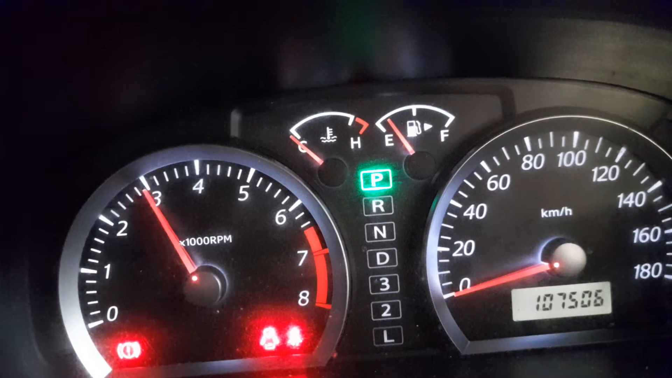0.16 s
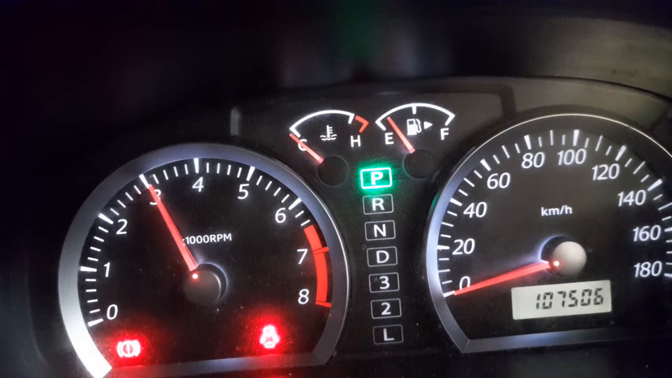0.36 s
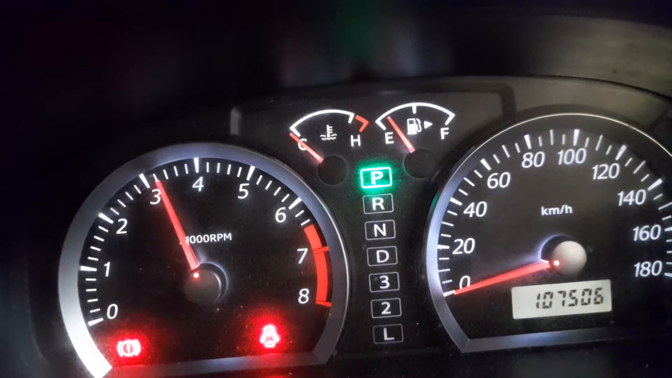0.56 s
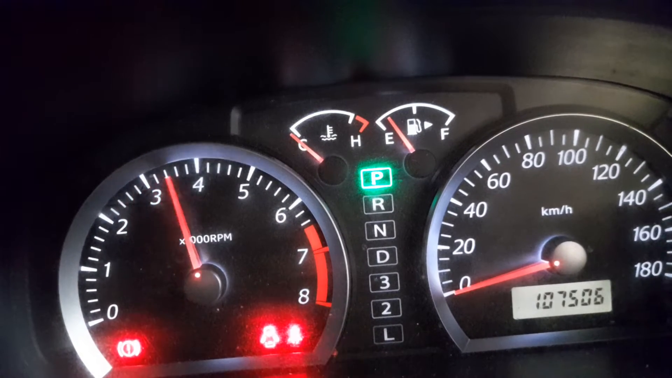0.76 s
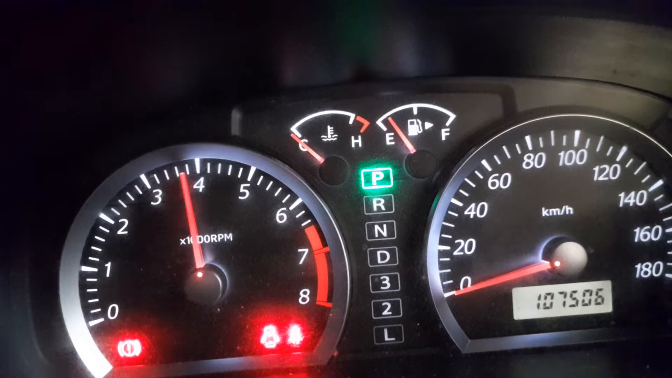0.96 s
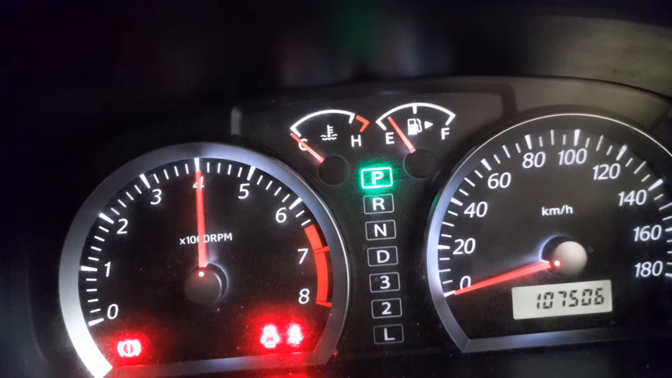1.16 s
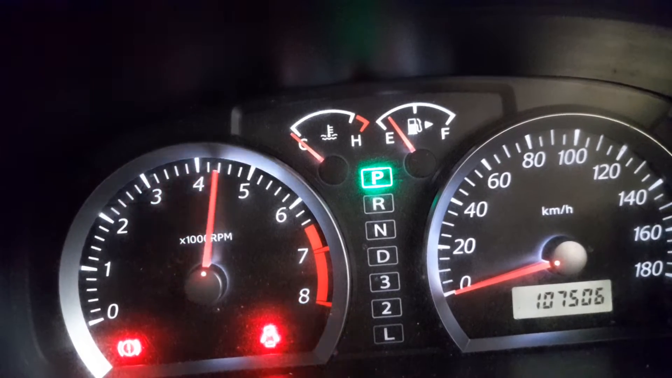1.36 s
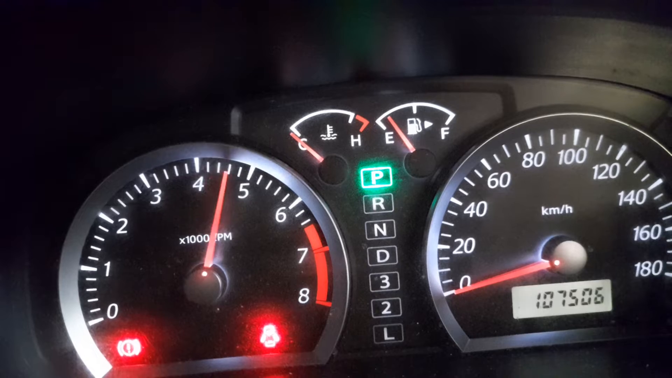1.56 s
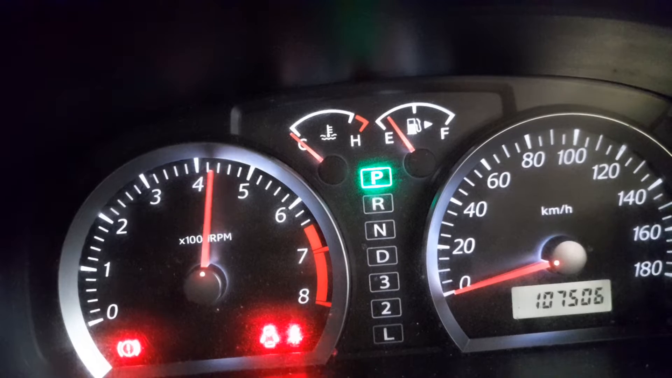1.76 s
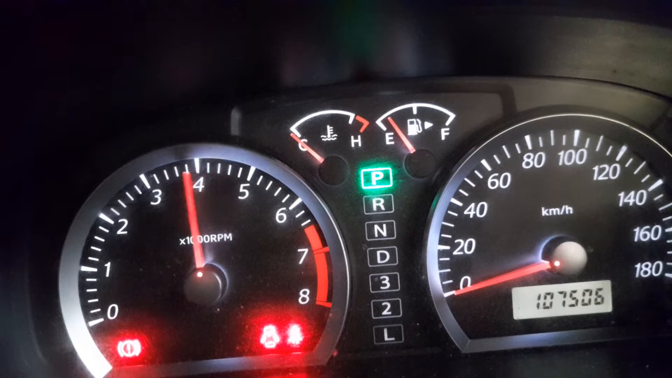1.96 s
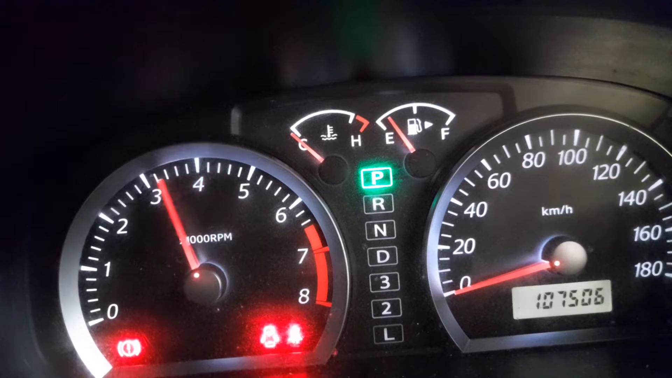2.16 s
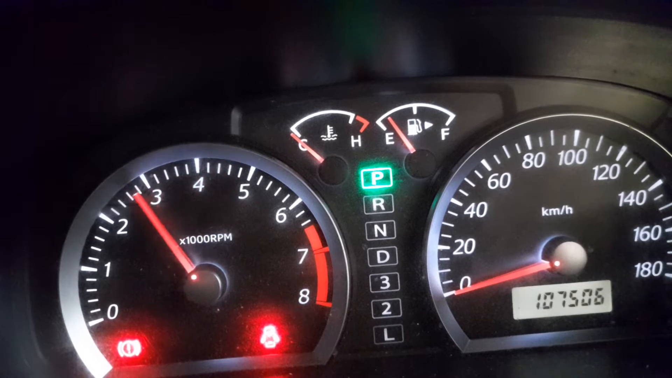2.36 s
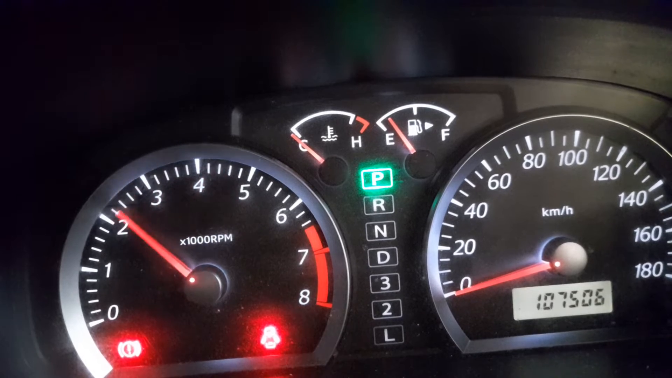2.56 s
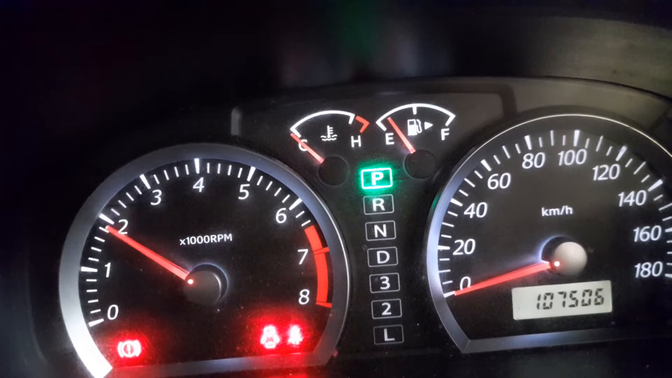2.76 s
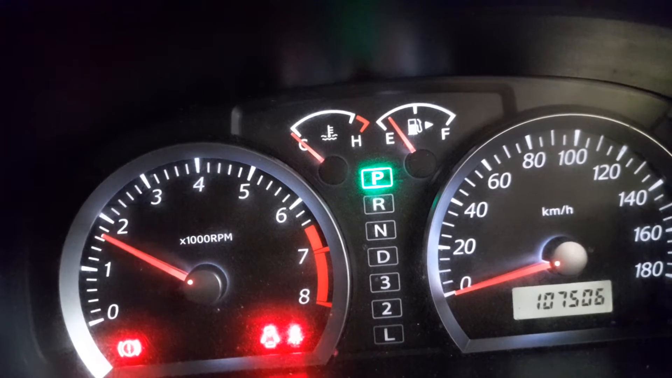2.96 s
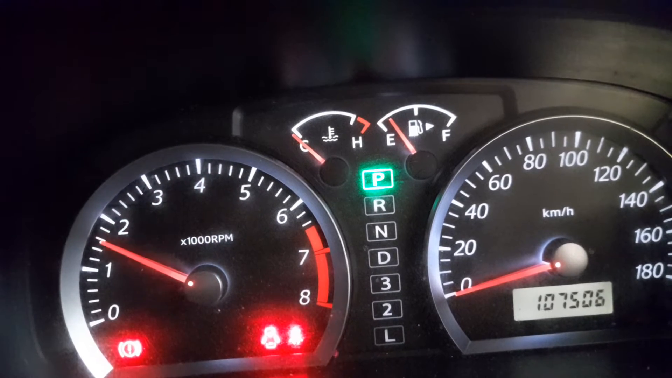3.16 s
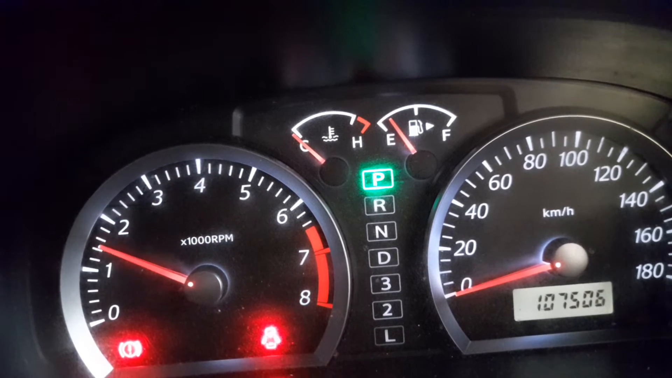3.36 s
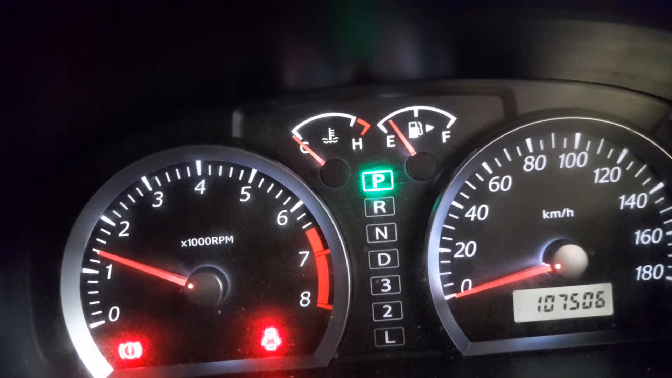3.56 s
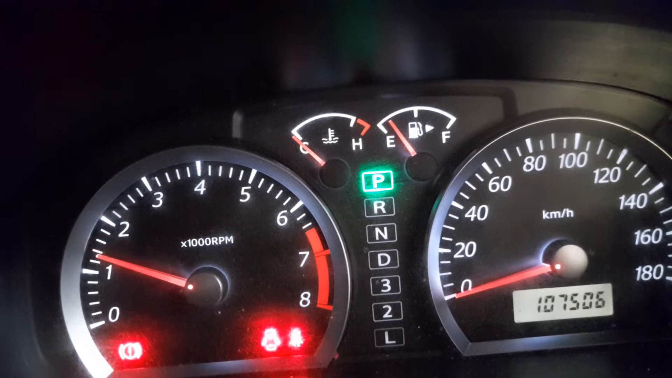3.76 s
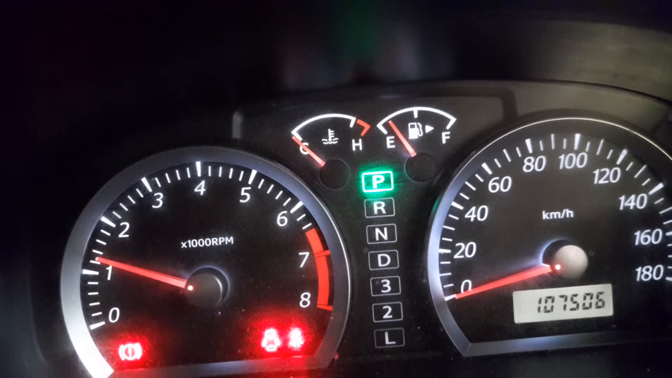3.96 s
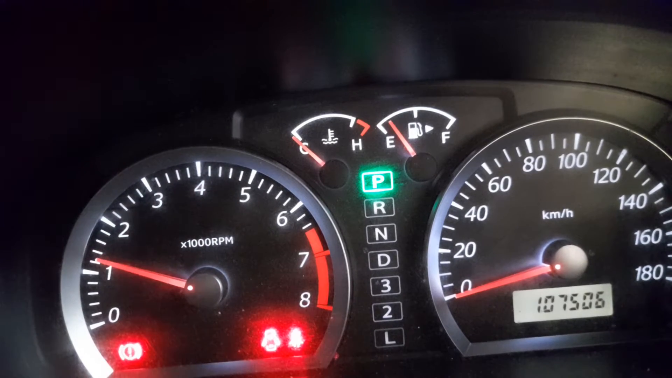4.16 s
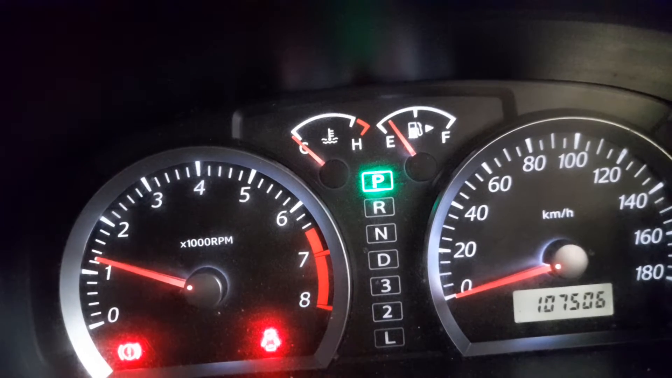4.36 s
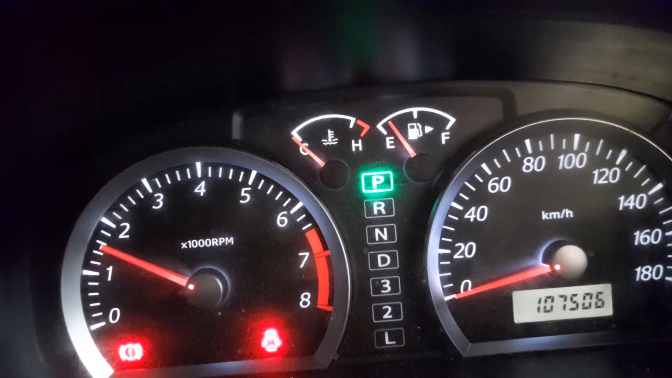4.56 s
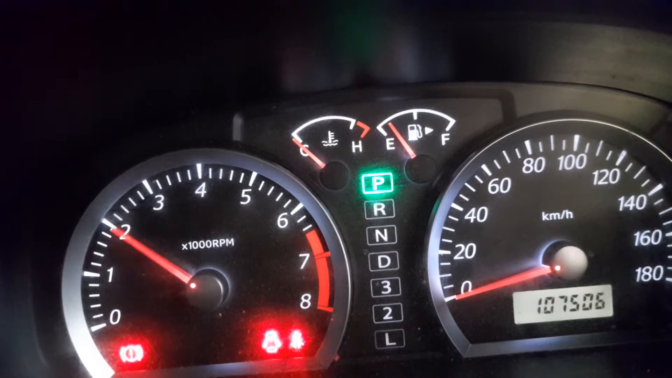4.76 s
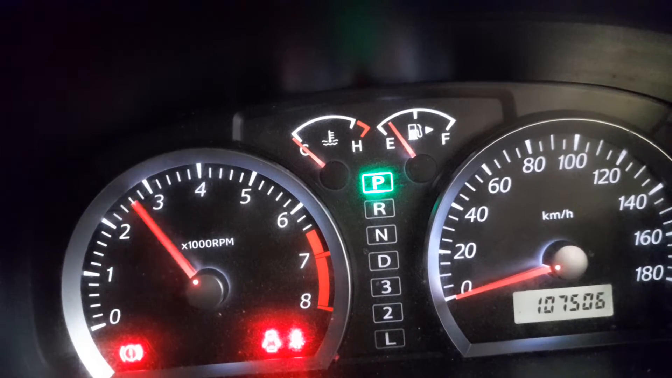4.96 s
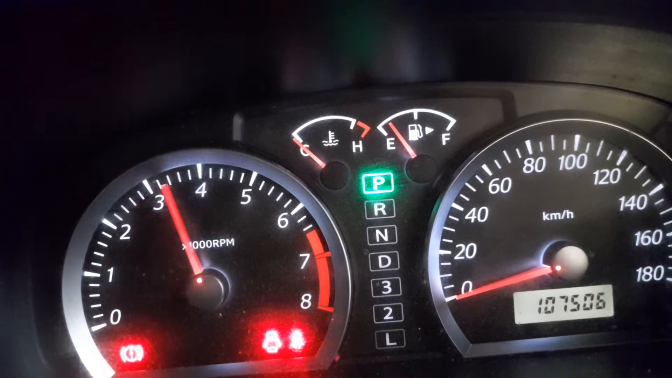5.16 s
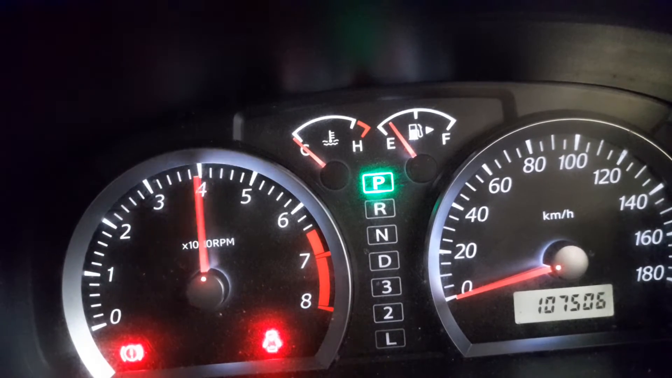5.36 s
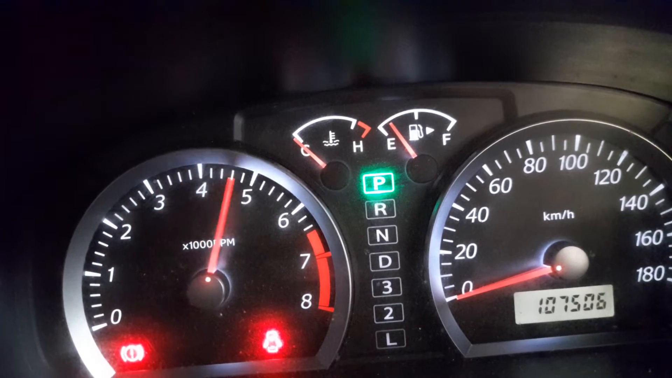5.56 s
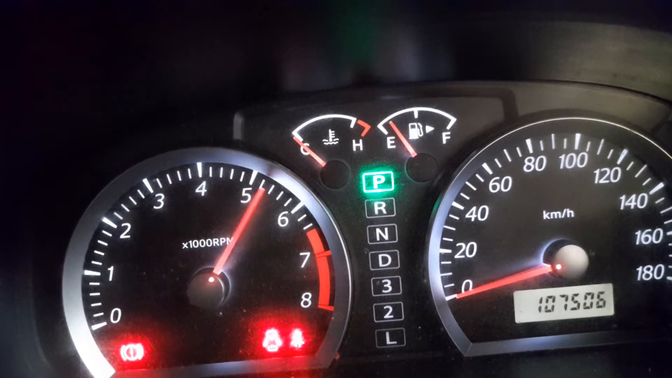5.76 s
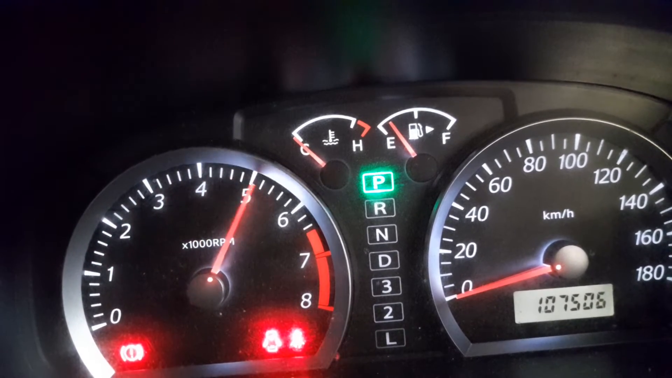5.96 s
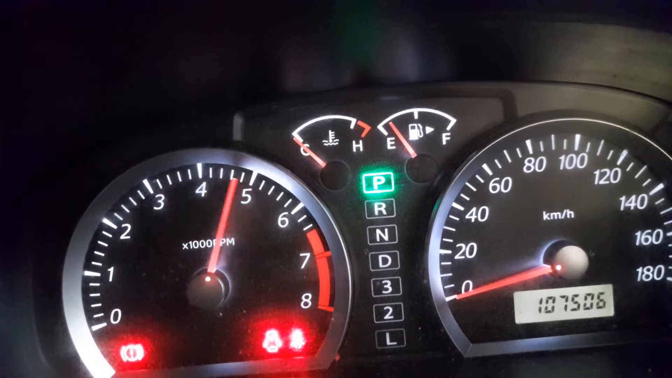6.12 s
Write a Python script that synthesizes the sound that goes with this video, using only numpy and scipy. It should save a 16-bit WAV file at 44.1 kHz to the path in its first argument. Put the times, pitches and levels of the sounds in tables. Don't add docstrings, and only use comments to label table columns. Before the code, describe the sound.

Inside a parked car, a small petrol engine is already revving and climbs smoothly to a first peak, then falls away to a low, muffled idle. After a short lull it is revved again, faster and louder, with a harsh rush of intake air before it starts dropping. Firing boom swells and fades in the cabin, with a thin gear whine on top. Close stereo microphone by the dashboard.

```python
import sys
import numpy as np
from scipy import signal
from scipy.fft import rfft, irfft, next_fast_len
from scipy.io import wavfile
from scipy.ndimage import uniform_filter1d, map_coordinates

SR = 44100
rng = np.random.default_rng(int(sys.argv[2]) if len(sys.argv) > 2 else 0)


def int16_out(signal):
    q = np.round(np.clip(np.atleast_2d(signal).T, -1, 1) * 32767)
    wavfile.write(sys.argv[1], SR, q.astype(np.int16))


def magnitude_from_level(level_db):
    exponent = np.asarray(level_db, float) / 20
    return 10 ** exponent


N = 272979


def along(points, hz):
    f, v = np.transpose(points)
    return np.interp(np.log(hz + 1), np.log(f + 1), v)


def curves(rows):
    s, *cols = np.transpose(rows)
    return [np.interp(np.arange(N) / SR, s, c) for c in cols]


def wobble(rate_hz, size=N):
    knots = rng.standard_normal(int(N * rate_hz / SR) + 4)
    return map_coordinates(knots, [np.arange(size) * rate_hz / SR])


def filtered(x, response):
    m = next_fast_len(N + SR // 2)
    return irfft(rfft(x, m) * response(np.fft.rfftfreq(m, 1 / SR)), m)[..., :N]


def humps(modes, hz):
    return sum(magnitude_from_level(db) / (1 + (2 * (hz - c) / w) ** 2) for c, w, db in modes)


# (frequency [Hz], level [dB])
LEAN = [(60, -3), (130, -1.0), (290, -1.5), (640, -0.5), (1410, -5), (3100, -3.0), (6820, -3.5),
        (15000, -6)]
# (frequency [Hz], phase [rad])
LEAD = [(60, 0), (430, 0.38), (560, -1.5), (800, -2.5), (1380, -2.5), (1950, -7), (2200, -7), (3200, -9.5),
        (15000, -48.5)]


def ports(hz):
    half = magnitude_from_level(along(LEAN, hz) / 2) * np.exp(.5j * along(LEAD, hz))
    return np.array([half, 1 / half])


# (frequency [Hz], likeness [0-1])
ALIKE = [(60, .97), (200, 0.66), (300, 0.5), (400, 0.54), (700, 0.82), (1100, 0.24), (1400, 0.61),
         (1800, 0.33), (2500, 0.16), (4000, 0.11), (15000, .02)]


def rush(colour, modes=()):
    def split(hz):
        gain = magnitude_from_level(along(colour, hz)) * (1 + humps(modes, hz))
        turn = np.arccos(np.clip(along(ALIKE, hz), 0, 1)) / 2
        return gain * [np.cos(turn), np.sin(turn)]

    shared, own = filtered(rng.standard_normal((2, N)), split)
    pair = filtered(np.array([shared + own, shared - own]), ports)
    return pair / np.std(pair.mean(axis=0))


def note(multiple, base_hz, level_db, blur_turns=0):
    hz = multiple * base_hz
    turns = multiple * np.cumsum(base_hz) / SR + rng.random()
    turns = turns + blur_turns * wobble(12, size=len(base_hz))
    half_lead = 1.05 * np.sin(along(LEAD, hz) / 2)
    half_lean = magnitude_from_level(along(LEAN, hz) / 2)
    left = half_lean * np.cos(2 * np.pi * turns + half_lead)
    right = np.cos(2 * np.pi * turns - half_lead) / half_lean
    return np.sqrt(2) * magnitude_from_level(level_db) / np.cos(half_lead) * np.array([left, right])


# (time [s], firing rate [Hz], effort as clatter level [dB])
DRIVE = [(0, 95.2, -39.5), (.5, 107.2, -38.5), (.85, 119.7, -36.5), (1.3, 145.2, -33), (1.52, 152.9, -31.5),
         (1.87, 121.4, -36), (2.4, 74.6, -45), (2.74, 58.5, -49), (3.0, 51.5, -49.5), (3.42, 44.6, -52),
         (3.95, 40.97, -52), (4.3, 44, -49), (4.43, 51.7, -47.5), (4.69, 70.64, -42.5), (4.9, 96.4, -39.5),
         (5.33, 143.9, -32.5), (5.71, 181.9, -27.5), (6.19, 133, -33.5)]


def drive():
    inertia_s = .11
    return uniform_filter1d(curves(DRIVE), int(inertia_s * SR), axis=1, mode="nearest")


def swing_db():
    mid_db = -40
    return drive()[1] - mid_db


def throttle():
    return np.clip(np.gradient(np.log2(drive()[0])) * SR, -1, 1.5)


def boom_hz():
    late = int(0.03002 * SR)
    return 1.007 * np.pad(drive()[0], (late, 0), mode="edge")[:N]


# (time [s], peak level [dB], half length [s])
THROBS = [(0.1, -18.5, 0.14), (0.267, -18.5, 0.085), (0.543, -18, 0.11), (0.793, -17, 0.09),
          (1.1, -21, 0.082), (1.37, -20, 0.15), (1.59, -16, .095), (1.79, -25, .035), (1.966, -21.5, 0.075),
          (2.18, -19, .065), (2.45, -19.5, 0.094), (2.647, -24.5, .04), (2.733, -28, .022),
          (2.797, -29.5, 0.021), (2.92, -34.5, .09), (3.107, -31.5, 0.049), (3.25, -39, 0.044),
          (3.92, -31, 0.18), (4.27, -32.5, .14), (4.721, -15, 0.057), (4.835, -16, 0.03),
          (4.959, -18, 0.043), (5.06, -18, 0.031), (5.137, -21.5, .033), (5.241, -21.5, .045),
          (5.373, -21, 0.14), (5.59, -20, 0.026), (5.736, -19, 0.07), (5.885, -28, 0.034),
          (6.071, -15, 0.091)]


def firing():
    fall_db, between_db = 7, -43
    t = np.arange(N) / SR
    power = sum(magnitude_from_level(db - fall_db * ((t - s) / half) ** 2) ** 2 for s, db, half in THROBS)
    level_db = 10 * np.log10(power + magnitude_from_level(between_db) ** 2)
    return note(0.99, boom_hz(), level_db)


# (frequency [Hz], width [Hz], level over effort [dB])
PAN_MODE = [(72.7, 7, -5)]


def crank():
    hz = boom_hz()
    load_db = 6 * np.minimum(throttle(), .5)
    return humps(PAN_MODE, hz / 2) * note(.5, hz, drive()[1] + load_db + 1.3 * wobble(4.6))


# (frequency [Hz], width [Hz], level over effort [dB])
BODY = [(97.23, 18, 11.5), (138, 28, 10.5), (222, 29, -1.5), (292.7, 32, -5), (431, 53, 5.5),
        (543, 35, -0.5)]


def body_shell():
    hz, effort_db = boom_hz(), drive()[1]
    load_db = 4 * np.minimum(throttle(), .5)
    second_db = effort_db - 4 + load_db + 2.3 * wobble(6.7)
    third_db = effort_db - 3 + 3 * wobble(6)
    second = humps(BODY, 2 * hz) * note(2, hz, second_db, blur_turns=0.062)
    third = humps(BODY, 3 * hz) * note(3, hz, third_db, blur_turns=0.0086)
    return second + third


# (multiple of firing rate, level [dB])
UNEVEN = [(1.25, -17), (1.5, -7), (1.75, -7), (2.25, -22), (2.5, -6), (2.75, -8), (3.25, -14), (3.5, -5),
          (3.75, -9.5), (4, -10), (4.25, -3), (5, -4)]
# (frequency [Hz], width [Hz], level [dB])
CABIN = [(159, 56, -6), (206.4, 31, -4.5), (317, 35, -5.5), (425, 39, -1), (544, 81, -6.5)]


def uneven_cylinders():
    hz, effort_db = boom_hz(), drive()[1]
    sound = 0
    for multiple, db in UNEVEN:
        waver = humps(CABIN, multiple * hz) * magnitude_from_level(5.37 * wobble(9))
        sound = sound + waver * note(multiple, hz, effort_db + db, blur_turns=0.051)
    return sound


# (frequency [Hz], width [Hz], level [dB])
BULKHEAD = [(224, 20, -8), (327, 22, -9), (416.3, 46.7, 1.1), (542, 27, -15.5), (814, 17, -21),
            (1293, 166, -17), (1530, 85, -22.5), (1970, 145, -15.5), (2350, 220, -23.5)]


def pump():
    teeth_per_firing, flicker_db = 4.53, 3.5
    hz = teeth_per_firing * drive()[0]
    db = -29 + swing_db()
    tooth_db = db - .8 + 2.2 * wobble(13)
    second_db = db - .4 + 0.47 * flicker_db * wobble(15)
    third_db = db - 2 + 1.1 * flicker_db * wobble(27)
    sound = humps(BULKHEAD, hz) * note(1, hz, tooth_db, blur_turns=0.022)
    sound += humps(BULKHEAD, 2 * hz) * note(2, hz, second_db, blur_turns=0.026)
    return sound + humps(BULKHEAD, 3 * hz) * note(3, hz, third_db, blur_turns=0.099)


VALVE_ORDERS = [7.5, 8, 9.5, 10, 10.5, 11, 11.5, 12, 12.5, 13, 14]
# (frequency [Hz], width [Hz], level over plain path [dB])
PANELS = [(823, 11, -5), (1044.5, 32, 3), (1227, 47, 3), (1312, 39, 0.5), (1536, 18, 2.5), (1663, 11, -1),
          (1934, 83, -4), (2300, 38, -3)]


def valve_gear():
    firing_hz, effort_db = drive()
    hz, flicker_db = 1.007 * firing_hz, 4
    sound = 0
    for k in VALVE_ORDERS:
        level_db = effort_db - 19 + flicker_db * wobble(13)
        sound = sound + humps(PANELS, k * hz) * note(k, hz, level_db, blur_turns=0.055)
    return sound


# (frequency [Hz], density [dB per Hz])
RUMBLE = [(20, -40), (40, -28), (60, -6), (72, 9), (84, -6.5), (130, 4.5), (165, -10.5), (200, -36),
          (300, -90)]


def rumble():
    return magnitude_from_level(0.56 * drive()[1] - 14 + 0.82 * wobble(4.2)) * rush(RUMBLE)


# (frequency [Hz], density [dB per Hz])
GROWL = [(110, -7.5), (180, -4.5), (360, -1.5), (403, -1.5), (452, 2), (498, -9), (561, -3), (639, -14),
         (700, -11), (910, -24), (1540, -120)]


def growl():
    load_db = 2.5 * np.maximum(throttle(), 0)
    return magnitude_from_level(-38.5 + 0.71 * swing_db() + load_db + 0.4 * wobble(5.1)) * rush(GROWL)


def flutter():
    crank_turns = np.cumsum(drive()[0]) / SR / 2
    once, twice = np.cos(2 * np.pi * crank_turns), np.cos(4 * np.pi * crank_turns)
    return 1 + 0.04 * once + 0.023 * twice


# (frequency [Hz], density [dB per Hz])
CLATTER = [(360, -12), (620, -3), (761, -6), (829, -1), (946, -4.5), (1030, -3), (1260, -3), (1440, -2.5),
           (1930, -2), (3000, -15.5), (3900, -60), (6600, -120)]


def clatter():
    return flutter() * magnitude_from_level(drive()[1] - 0.9 + 0.31 * wobble(6.2)) * rush(CLATTER, PANELS)


def bend_db():
    return 0.017 * swing_db() ** 2


# (frequency [Hz], density [dB per Hz])
INTAKE = [(1530, -24), (2600, 0), (2780, -2), (3050, -1), (3490, -0.5), (4610, -3.5), (4930, -3),
          (6510, -6), (7450, -6), (8200, -16), (10700, -45), (18000, -120)]
# (frequency [Hz], width [Hz], level over plain path [dB])
DUCT = [(2735, 44, 1), (4190, 89, -3), (7360, 440, -7.5)]


def intake():
    level_db = -45 + 1.006 * swing_db() + 0.54 * bend_db() + 0.28 * wobble(5.4)
    return flutter() * magnitude_from_level(level_db) * rush(INTAKE, DUCT)


# (frequency [Hz], density [dB per Hz])
FAN = [(4590, -32), (7800, -6), (8100, -12), (8510, -6), (12000, 0.5), (14800, -1), (15600, -0.5)]


def fan():
    level_db = -50 + 1.11 * swing_db() + bend_db() + 0.53 * wobble(8.2)
    return flutter() * magnitude_from_level(level_db) * rush(FAN)


# (time [s], multiple of firing rate, peak level [dB], half length [s])
FLARES = [(0.138, 0.75, -31, 0.12), (0.148, 4, -39.5, 0.13), (0.449, 4, -42.5, 0.16),
          (0.678, 2, -35.5, .11), (0.717, 3.5, -35.5, 0.13), (0.866, 1.75, -35.5, 0.2),
          (1.021, 3.25, -36, 0.15), (1.132, 4, -32.5, 0.1), (1.33, .5, -28.5, .19),
          (1.354, 2.25, -35, 0.14), (1.354, 2.75, -28, 0.077), (1.377, 3.25, -35, 0.098),
          (1.424, 3.5, -39, 0.12), (1.62, 2, -36.5, .09), (1.8, .5, -36, .13), (1.8, 2, -37, .11),
          (1.86, 1.75, -38, .15), (2.17, 0.75, -39, 0.17), (2.449, 3, -41.5, .09), (4.72, 2, -29.5, .12),
          (4.798, 2.75, -46, .06), (5.103, 3.5, -33.5, 0.063), (5.185, 3.25, -32.5, 0.069),
          (5.381, 3, -30, 0.068), (5.402, .5, -30, .09), (5.42, 0.75, -36, 0.79), (5.406, 2.75, -29, 0.12),
          (5.45, 3.5, -33.5, .09), (5.611, 2.5, -29, 0.11), (5.67, 1.75, -37, 0.07)]
# (time [s], multiple of firing rate, peak level [dB],
# half length [s])
WHINES = [
    (0.15, 22.5, -49, 0.25),
    (0.581, 22, -50, 0.14),
    (1.41, 17, -49, 0.12),
    (1.42, 14.3, -42, 0.27),
    (1.419, 22.5, -45, 0.18),
    (2.471, 18, -46, 0.062),
    (4.672, 18, -42.5, 0.048),
    (5.349, 15.1, -44, 0.094),
    (5.657, 7, -39, 0.12),
]


def flares():
    sound, late_hz, prompt_hz = np.zeros((2, N)), boom_hz(), 1.007 * drive()[0]
    for s, multiple, db, half in FLARES + WHINES:
        order = round(4 * multiple) / 4
        span = slice(max(0, int((s - 2 * half) * SR)), int((s + 2 * half) * SR))
        t = np.arange(N)[span] / SR
        hz = late_hz if order < 7 else prompt_hz
        flicker_db = order * (.18 * wobble(20.6, size=len(t)) - .12)
        swell_db = db - 8.3 * ((t - s) / half) ** 2 + flicker_db
        sound[:, span] += note(order, hz[span], swell_db, blur_turns=.015 + .005 * order)
    return sound


# (frequency [Hz], level [dB], left gain)
IDLE_LINES = [(452, -56, -.3), (1507, -61, 1), (1685, -66, .5), (5060, -69.5, 1)]


def idle_lines():
    start_s, end_s, fade_s, unsteady_db = 3.62, 4.22, 0.082, 1.5
    t = np.arange(N) / SR
    on = np.clip(np.minimum(t - start_s, end_s - t) / fade_s, 0, 1)
    sound = 0
    for hz, db, left in IDLE_LINES:
        line = note(0.99, np.full(N, hz), db + unsteady_db * wobble(14.0), blur_turns=.04)
        sound = sound + on * [[left], [2 - left]] * line
    return sound


def scene():
    orders = firing() + crank() + body_shell() + uneven_cylinders() + flares()
    noise = rumble() + growl() + clatter() + intake() + fan()
    return orders + pump() + valve_gear() + noise + idle_lines()


def roll_off(x):
    return signal.sosfilt(signal.butter(12, 15770, fs=SR, output="sos"), x)


def record(dry):
    def microphone(hz):
        return (hz < 15750) / np.sqrt(1 + (34 / (hz + 1)) ** 7)

    return roll_off(filtered(dry, microphone))


dry = scene()
out = record(dry)
int16_out(out)
```